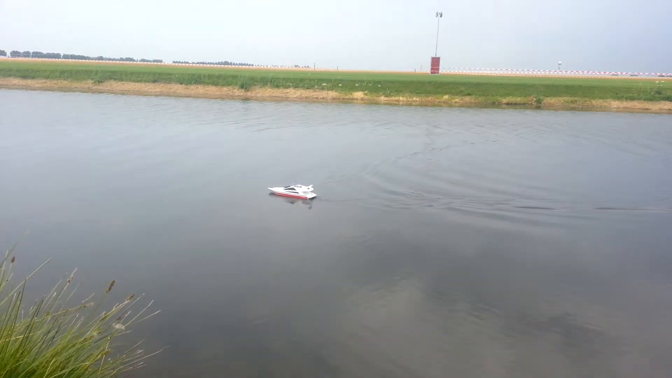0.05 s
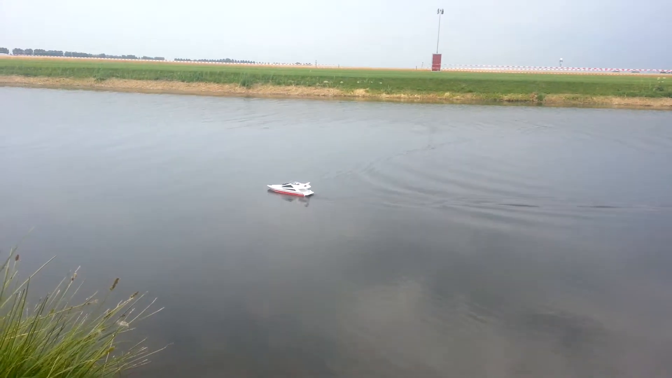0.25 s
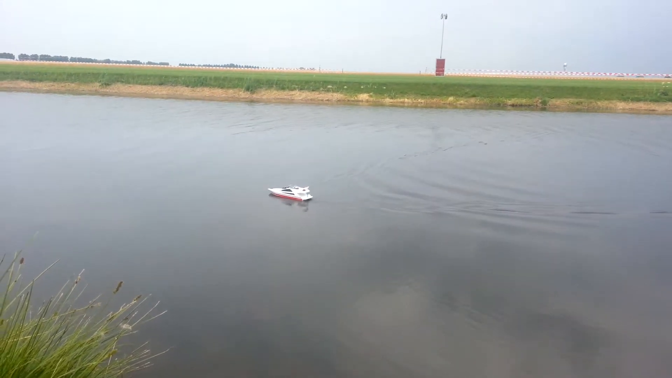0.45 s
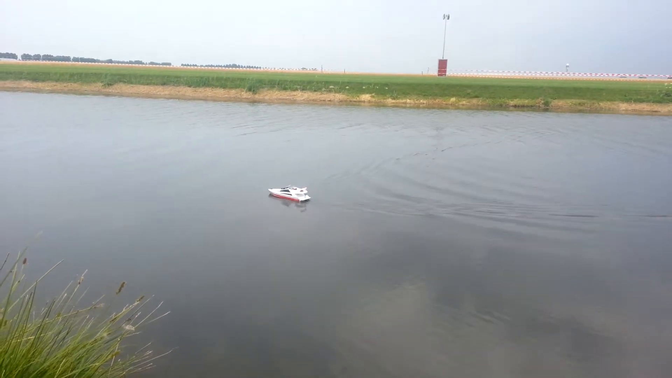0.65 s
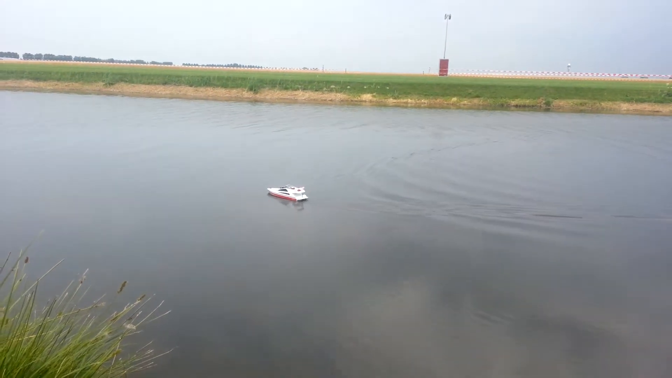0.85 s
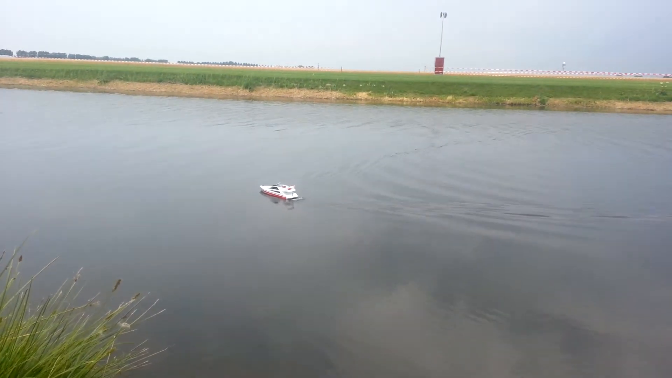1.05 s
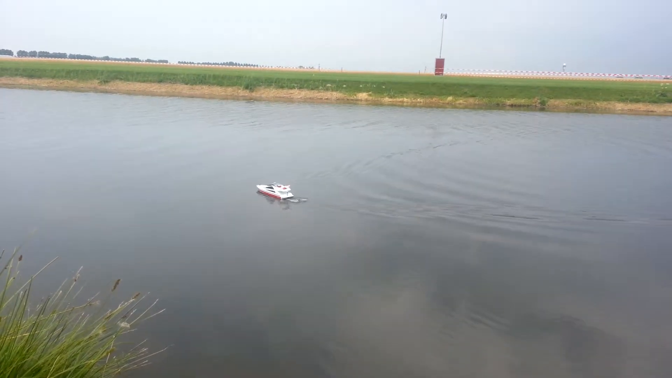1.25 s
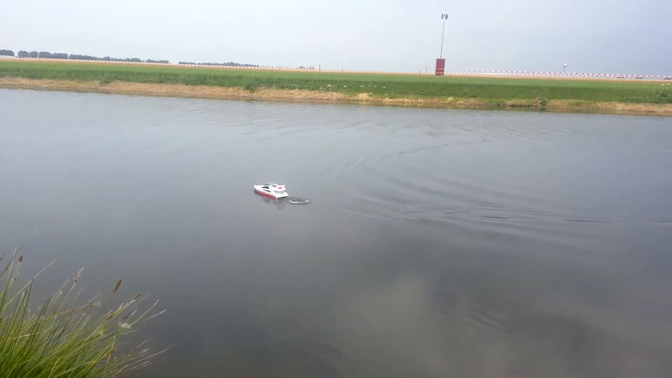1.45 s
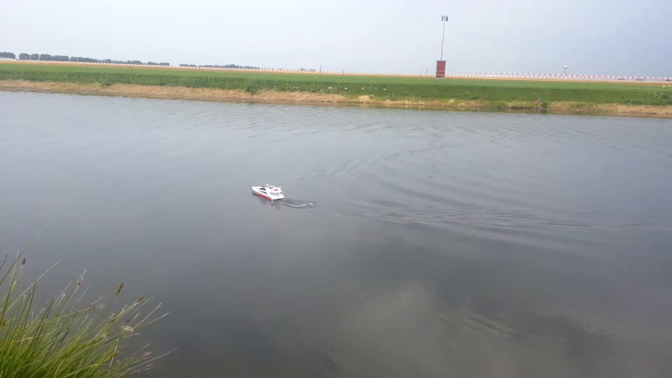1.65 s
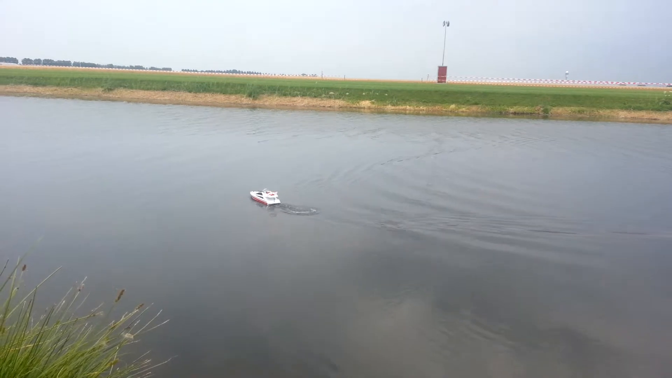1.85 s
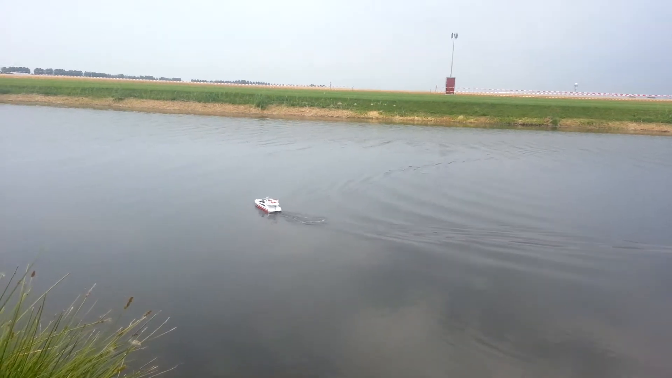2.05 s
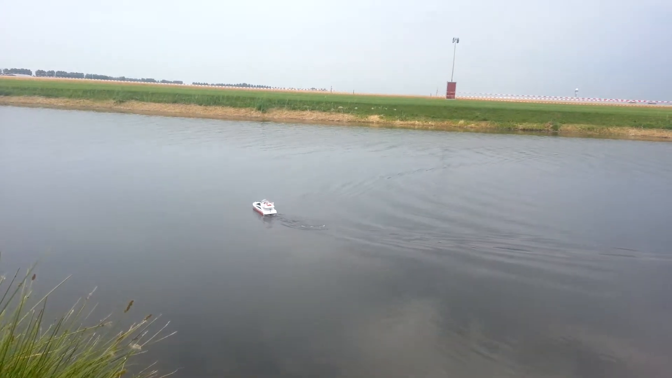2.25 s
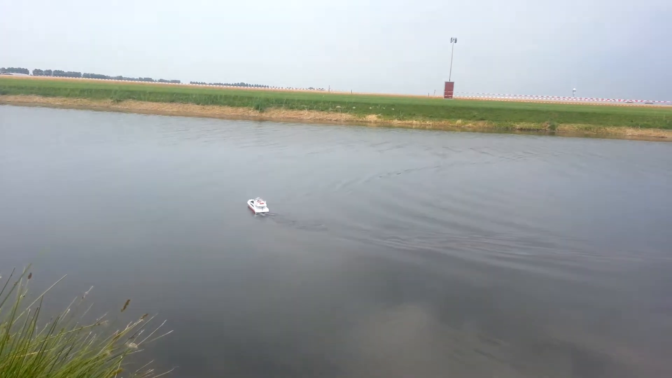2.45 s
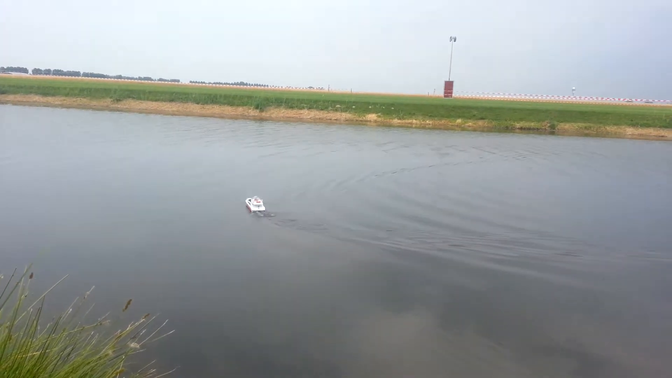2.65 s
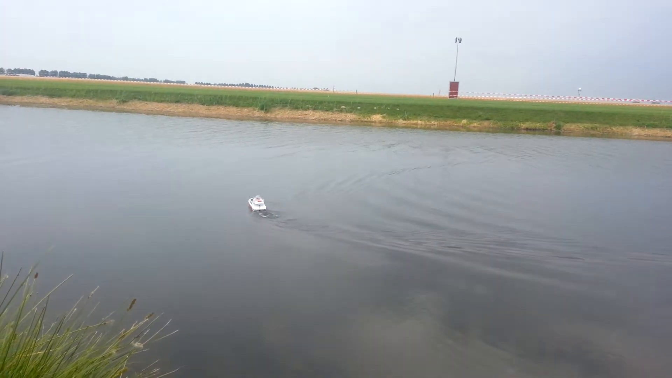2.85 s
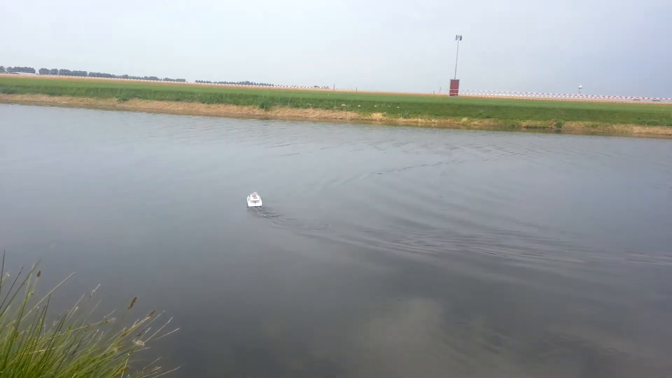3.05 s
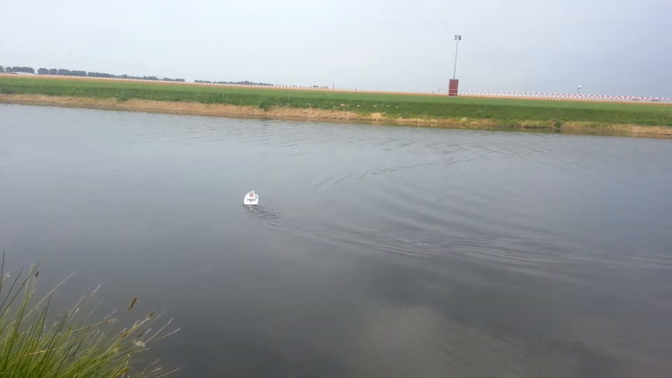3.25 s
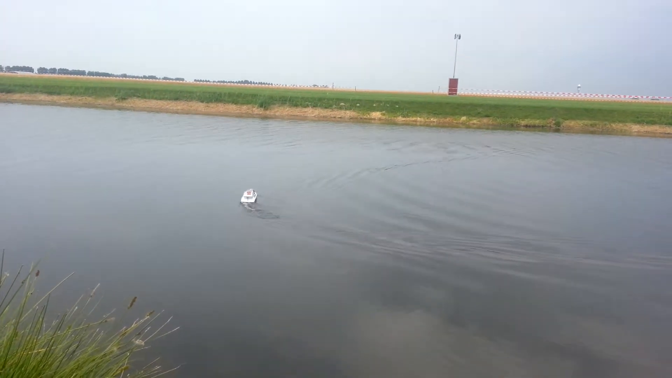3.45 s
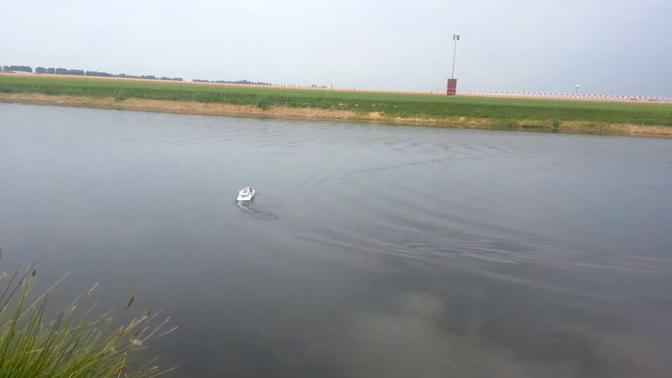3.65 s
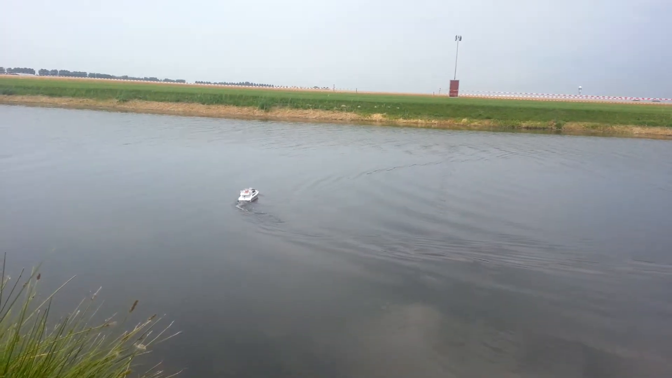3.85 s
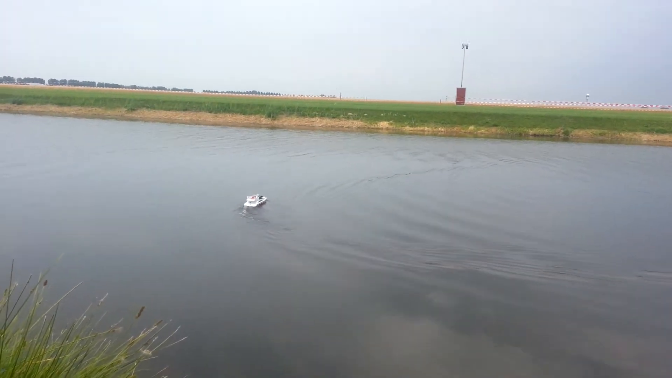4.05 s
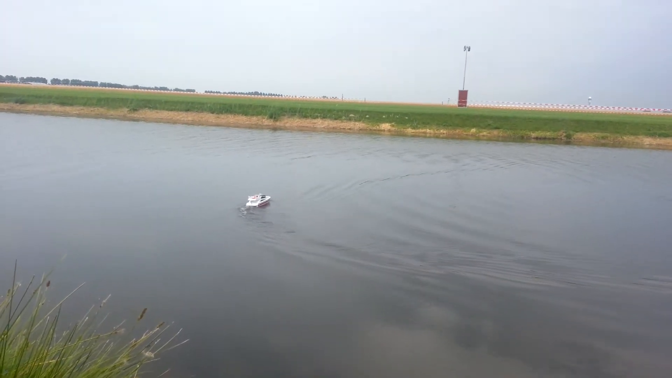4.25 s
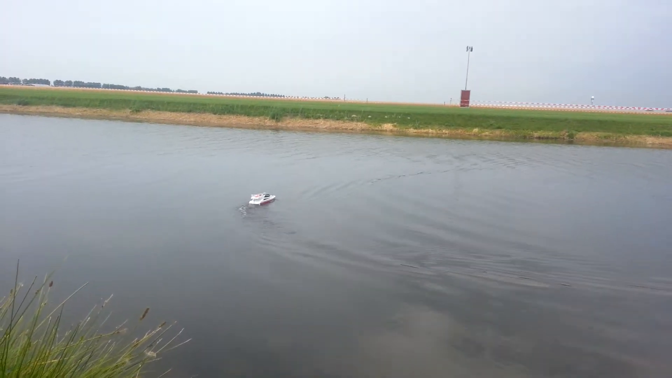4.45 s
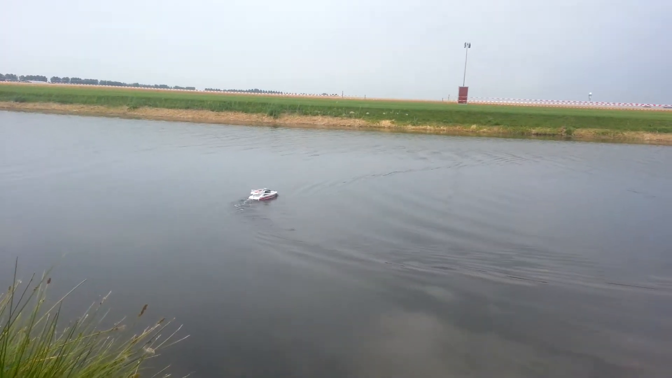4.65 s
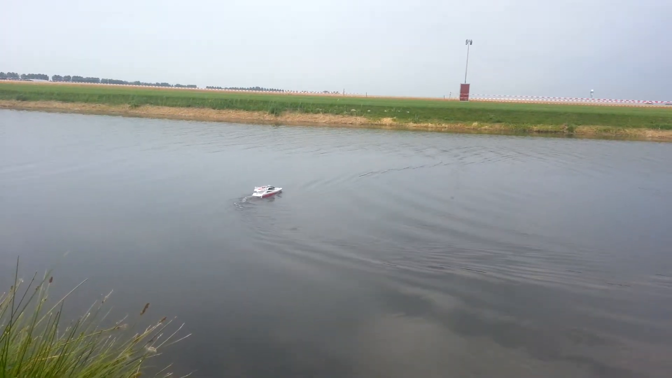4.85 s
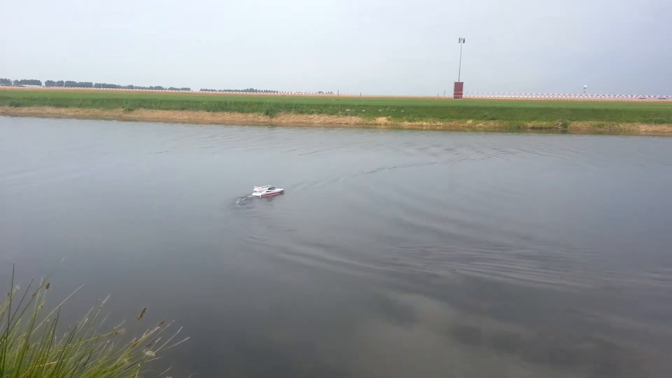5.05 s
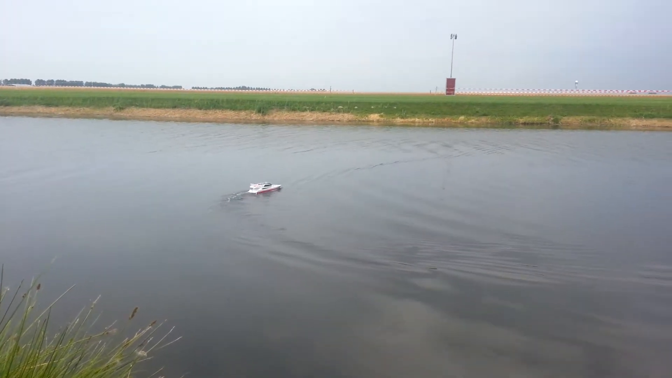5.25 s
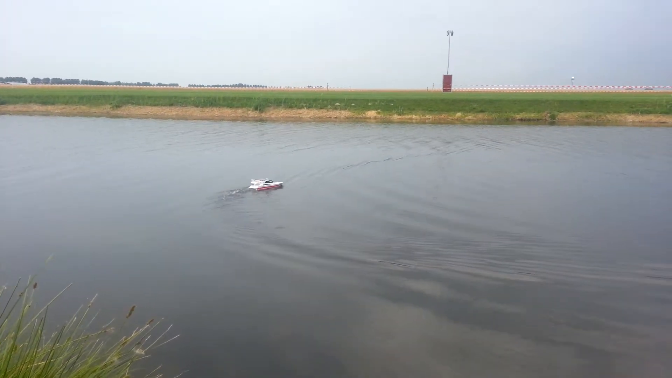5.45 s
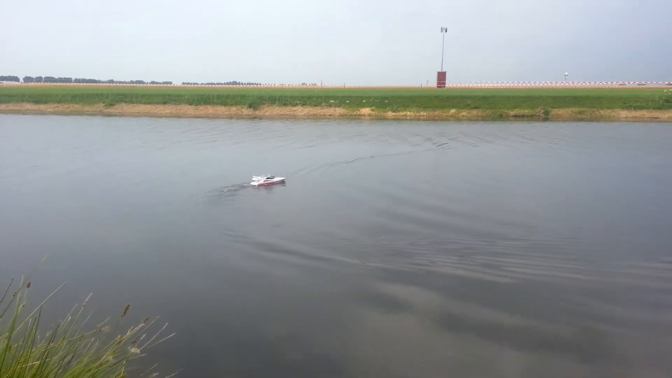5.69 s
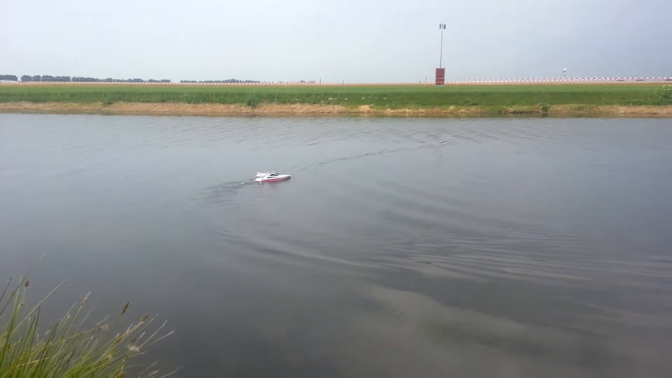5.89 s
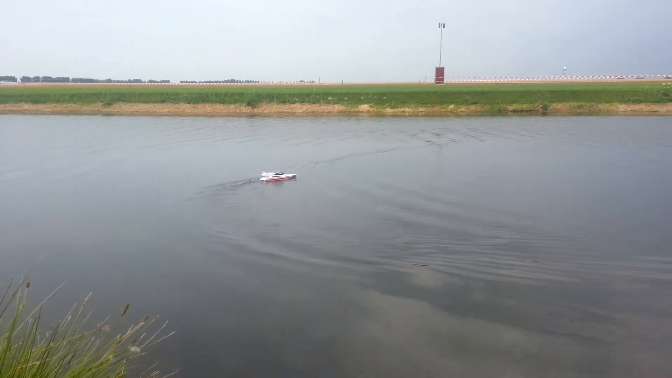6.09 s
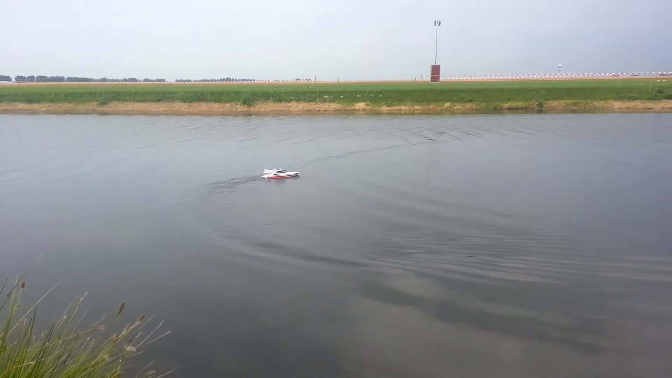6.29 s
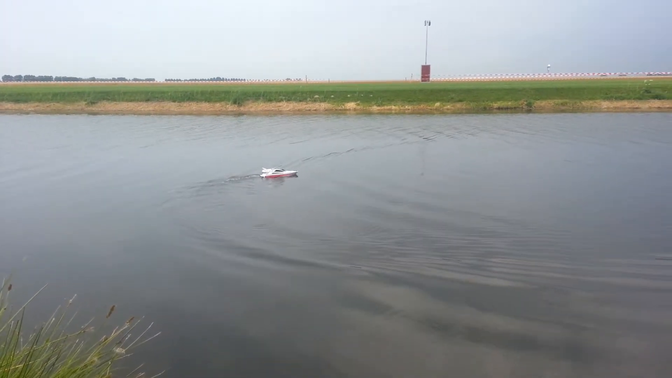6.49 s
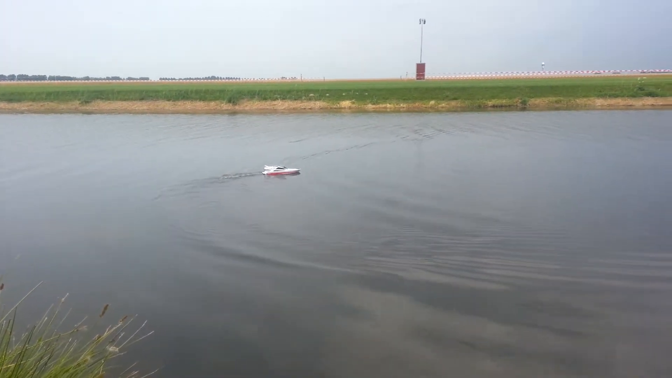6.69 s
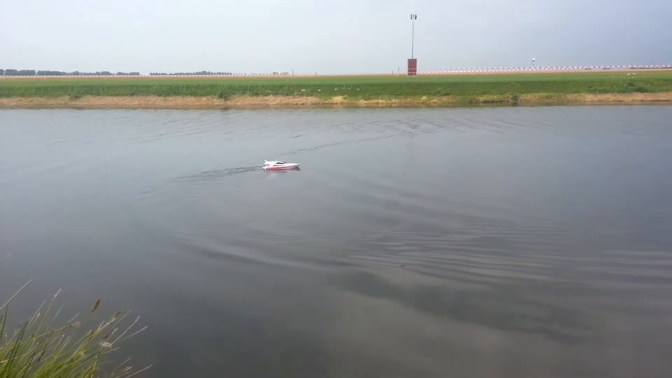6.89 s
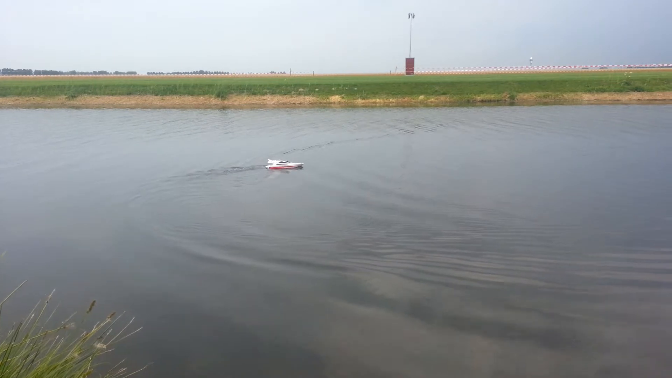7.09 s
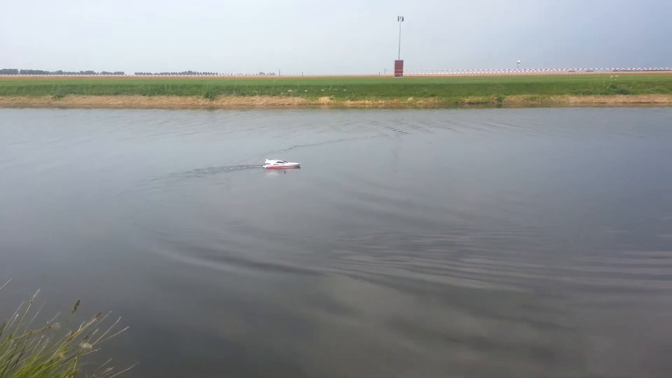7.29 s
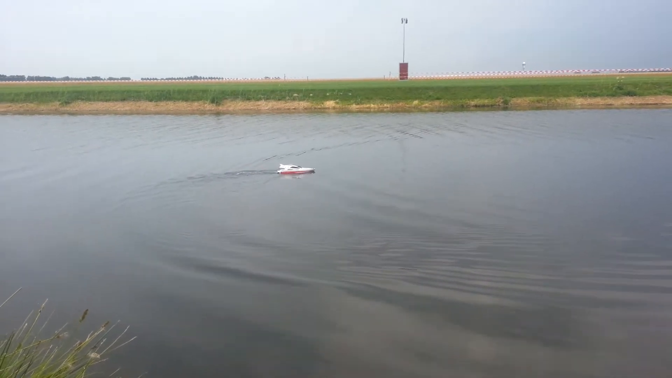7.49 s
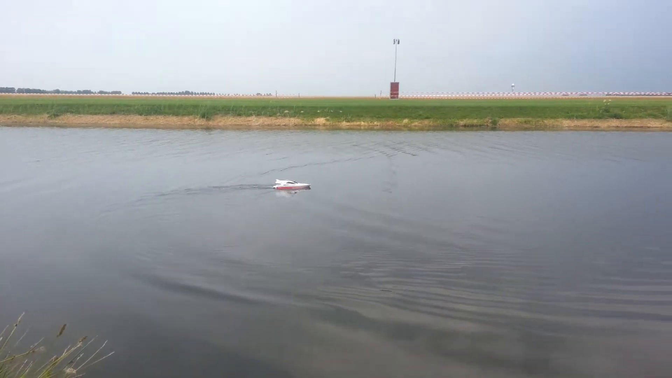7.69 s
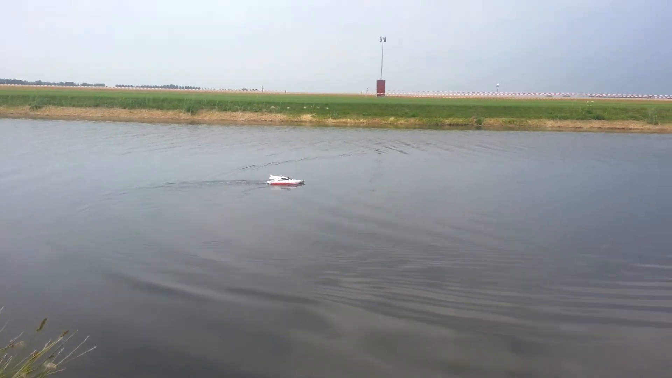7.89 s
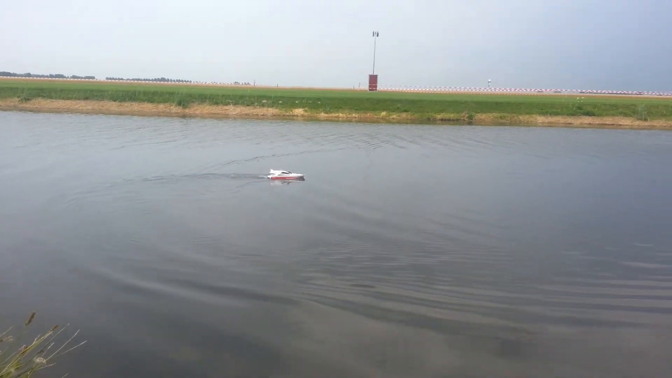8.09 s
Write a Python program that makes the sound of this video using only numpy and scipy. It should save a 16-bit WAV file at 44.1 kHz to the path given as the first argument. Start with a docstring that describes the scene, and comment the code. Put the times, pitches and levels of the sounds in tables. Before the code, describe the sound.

A small model boat's electric motor bursts on, coasts, then runs steadily, its loose shaft rattling buzzily in a hollow hull over quiet outdoor air.

```python
"""The loose drive shaft of a radio-controlled model boat scrapes, taps and knocks in its hollow, ringing hull.
Throttle moves set a lagging shaft speed, slowed by waves: a short burst, a coast, a long run, a turn and away.
The motor hums at shaft orders and adds steady tones; the propeller makes shaped noise, bubble pops and drops.
Shaped noise gurgles as water along the hull; a wavering far engine drones under open-air noise."""
import sys
import numpy as np
from scipy import signal
from scipy.fft import rfft, irfft, next_fast_len
from scipy.io import wavfile
from scipy.ndimage import uniform_filter1d, map_coordinates

SR = 44100
rng = np.random.default_rng(int(sys.argv[2]) if len(sys.argv) > 2 else 0)


def output_pcm(signal):
    """Save a mono or channel-first signal as 16-bit PCM at the path in sys.argv[1].

    Samples are clipped to [-1, 1] before scaling.
    """
    pcm = np.clip(np.atleast_2d(signal).T, -1, 1) * 32767
    wavfile.write(sys.argv[1], SR, np.round(pcm).astype(np.int16))


N = 358533

# open-air noise spectrum: (frequency [Hz], relative level [dB])
AIR_SPECTRUM = [(15, -58), (25, -58), (194, -18), (240, -16), (275, -11.5), (305, -7), (340, -10),
                (388, -17.5), (432, -9), (520, -11), (716, -14.5), (1770, -16), (6520, -29.5),
                (8740, -27.5), (14500, -26.5)]
# open-air level: (time [s], level [dB])
AIR_LEVEL = [(0, -55.5), (0.25, -53), (0.5, -54), (0.75, -57), (1.0, -53), (2.1, -54), (3, -50.5)]
# left-right correlation of the air: (frequency [Hz], correlation [-1 to 1])
AIR_CORRELATION = [(60, -0.098), (150, 0.43), (380, 0.85), (940, -0.21), (2350, -0.26), (5880, 0.14),
                   (14700, -0.18)]
# far engine note: (time [s], frequency [Hz], level [dB])
DRONE = [(0.4, 312.4, -62), (0.7, 300.4, -77), (2.0, 298, -68.5), (2.9, 290, -62), (3.6, 303, -73),
         (5.3, 286.4, -58), (6.8, 306, -78)]

# boat, level between channels: (frequency [Hz], left minus right [dB])
BOAT_BALANCE = [(700, -0.5), (950, -5), (1100, -0.5), (1650, -9.5), (1920, -4.5), (2200, -11), (2550, -2),
                (2800, -9), (3100, 3.5), (3450, -4.5), (4700, 6), (6000, -8), (9000, 3), (14000, 8)]
# boat, phase between channels: (frequency [Hz], left lead [rad])
BOAT_PHASE = [(250, -0.5), (850, 0.9), (1400, -1.4), (1850, 1), (2080, -1.5), (2400, 0.5), (2700, 0.37),
              (3050, 0.5), (3400, 1.5), (4300, 0), (5200, 3.5), (6200, 4.5), (8500, 5), (10500, -6)]
# sound scattered by the water: (frequency [Hz], level against direct sound [dB])
BOAT_SCATTER = [(300, -13), (700, -14.5), (1500, -9.5), (2500, -8.5), (3600, -8), (6000, -6), (8000, -2),
                (10000, 28)]
TOP_HZ = 14600

# throttle stick moves: (time [s], shaft speed asked for [turns/s], 0 = motor off)
THROTTLE = [(0.985, 37), (1.052, 46.4), (1.315, 38), (1.66, 38.6), (1.892, 0), (2.255, 37), (2.325, 44),
            (2.55, 42), (2.91, 45.3), (3.2, 46.1), (3.42, 47), (4.6, 46.8), (5.25, 45.9), (6.46, 44.7),
            (7.17, 45.5), (7.65, 46.7)]
# small waves load the propeller, a trough frees it: (time [s], speed lost [turns/s])
WAVES = [(3.84, 2.7), (4.0, 1.7), (4.46, 3), (4.97, 3.3), (5.14, -1.3), (5.33, 1.3), (5.88, 0.9),
         (6.19, 2.5)]
SPIN_UP_S, SPIN_DOWN_S = 0.036, 0.062  # lag time constants
WAVE_HALF_S = 0.1  # half the time a wave takes to pass
WAVER_TURNS_PER_S, WAVER_PER_S = 0.25, 10  # ripples make the speed waver
CRUISE_TURNS_PER_S = 46
# boat at cruising speed as it nears, turns, leaves: (time [s], hull rattle [dB], propeller fizz [dB])
PASSAGE = [(1.08, -32.3, -59), (1.3, -36.5, -54), (1.45, -40.5, -58), (1.85, -39, -49), (2.42, -37, -47.5),
           (2.62, -35.5, -48), (2.8, -40.5, -55.5), (2.9, -40.5, -68), (2.98, -38, -51.5),
           (3.3, -38, -48.5), (3.75, -39, -56.5), (4.1, -38.5, -55), (4.9, -38, -57), (5.3, -39, -55.5),
           (5.8, -39, -57), (6.5, -40.5, -55), (7.2, -41.5, -54), (8.1, -43.5, -57.5)]
# times of the bow, stern, quarter, side and far-side views: (time [s])
HEADINGS_S = [1.5, 3.5, 5.2, 6.7, 8.0]
RATTLE_DB_PER_OCTAVE, FIZZ_DB_PER_OCTAVE, HUM_DB_PER_OCTAVE = 13, 18, 11.5  # per doubling of shaft speed

# water noise along the hull: (frequency [Hz], relative level [dB])
WATER_SPECTRUM = [(60, -59), (110, -67), (150, -25), (210, -16.5), (285, -1), (360, -9), (430, 3.5),
                  (600, -3.5), (1200, -43)]
# water surges against the hull: (time [s], half length [s], level [dB])
SURGES = [(1.22, 0.11, -55), (4.2, 0.19, -51.5), (5.3, 0.34, -51.5), (8.0, 0.28, -50.5)]
WASH_DB = -62

# loudest drops thrown by the propeller: (time [s], peak level [dB], starting pitch [Hz])
DROPS = [(1.074, -37, 5970), (1.218, -37, 7340), (1.236, -34, 7600), (1.33, -37, 5870), (1.811, -34, 4720),
         (2.487, -29.5, 4020), (3.58, -34.5, 4620), (4.069, -37, 4700), (4.157, -35, 4430),
         (5.633, -28.5, 3340), (6.951, -32, 4170), (7.036, -38, 4223), (7.905, -35, 4020)]
# propeller froth: (frequency [Hz], relative level [dB])
FIZZ_SPECTRUM = [(1500, -54), (3000, 9.5), (4300, 6.5), (5300, 8), (6300, -3), (7600, -7), (9000, -6.5),
                 (11000, -1), (14500, -23)]
# finest spray: (frequency [Hz], relative level [dB])
MIST_SPECTRUM = [(3500, -42), (5200, -16), (6300, 3), (8200, -2), (9200, -10), (14500, -18)]
# propeller breaks the surface: (time [s], half length [s], fizz level [dB], mist level [dB])
SPRAYS = [(1.017, 0.006, -46, -56), (1.093, 0.032, -58, -49), (1.204, 0.069, -47, -52),
          (1.655, 0.05, -62, -53), (1.84, 0.028, -56, -52), (2.41, 0.055, -50, -76),
          (3.32, 0.043, -64.5, -61), (4.558, 0.04, -51, -71), (5.14, 0.19, -57, -59),
          (5.648, 0.0088, -49, -58), (5.99, 0.023, -50.5, -56), (6.63, 0.054, -61, -61),
          (6.99, 0.085, -57, -60), (7.15, 0.0055, -55, -46), (7.54, 0.099, -55, -58)]
FIZZ_WANDER_DB, FIZZ_WANDER_PER_S = 2, 9.9  # the propeller draws air unevenly

# motor hum at cruising speed: (time [s], lower line [dB], upper line [dB])
HUM = [(1.0, -57, -61), (1.2, -47, -62), (1.33, -52, -50), (1.5, -51, -61), (1.85, -54, -60),
       (2.4, -54, -54), (2.9, -54, -52), (3.2, -50, -47.5), (3.55, -51, -45.5), (3.85, -54, -50),
       (4.0, -53, -46), (4.25, -52, -50), (4.48, -51, -44), (4.72, -49, -49), (4.95, -52, -49),
       (5.16, -52, -44.5), (5.4, -53, -50), (5.7, -51, -47.5), (6.15, -53, -54), (6.42, -47.5, -53),
       (6.62, -51, -53), (6.8, -52, -52), (6.97, -46.5, -62), (7.35, -48, -60), (7.6, -52, -60),
       (8.1, -49.5, -62)]
# hum order between them swells, at cruising speed: (time [s], half length [s], level [dB])
MIDDLE_HUM = [(1.22, 0.07, -50), (6.33, 0.053, -51)]
# hum lines, lower to upper: (multiple of shaft speed)
HUM_ORDERS = (13, 14, 15)
HUM_ROUGHNESS, HUM_FLUTTERS_PER_S = 0.37, 70
# steady drive tones at cruising speed: (frequency [Hz], level before heading offset [dB])
WHINE = [(1809, -57.5), (1901, -58.5), (5704, -71), (6375, -75), (7279, -79)]
# offset of the steady tones, one for each heading: (level [dB])
WHINE_HEADING_DB = (3, -1, -3, -0.5, -6)

# broad hull radiation: (frequency [Hz], gain [dB])
HULL_RADIATION = [(50, -62), (100, -66.5), (250, -24.5), (380, -23), (520, -9.5), (800, -3.5),
                  (1050, -10.5), (2050, -15.5), (2800, -18), (4500, -27.5), (5400, -22.5), (8500, -30.5),
                  (15000, -46)]
# hull resonances: (frequency [Hz], width [Hz], gain from bow, stern, quarter, side, far side [dB])
HULL_MODES = [(601, 108, 7.5, 3, 0.5, 3, 0), (695, 190, 3, 0.5, 4, 2, -3),
              (892, 190, 0, 2.5, -1.5, -5.5, -4), (1142, 32, 4, -6.5, 0, 8, 3.5),
              (1270, 240, 12, 10.5, 2.5, 3, 11.5), (1457, 370, 5, 9.5, 11, 6.5, -5),
              (1733, 260, 6.5, 9.5, 9, -2, 7), (2000, 330, 4.5, -13, 1.5, -0.5, 3),
              (2319, 400, 9.5, 12, 14.5, 9, 2.5), (2494, 95, 4, 1.5, 1.5, 9, 0),
              (2930, 140, 8.5, 4, -1, 9, 1), (3395, 410, 4.5, 9.5, 2.5, 6.5, 0),
              (3996, 340, 7.5, 3.5, 9.5, 11, 9), (4900, 540, 7.5, 7.5, 4, 1, 3),
              (5000, 260, -3, 8, -2, -2, -2), (5720, 200, 7, 2, 2, 0, 0), (6080, 560, 3, -20, 0.5, -16, -5),
              (7600, 2900, 6, 1.5, -0.5, 0.5, -3.5)]
ROCK_DETUNE, ROCKS_PER_S = 0.025, 5  # resonance shift as a share; shifts per second
# shaft tube rings: (frequency [Hz], relative level [dB], t60 [s])
TUBE = [(1254, -0.5, 0.014), (1565, -0.5, 0.022), (1783, -6, 0.034), (2367, -4.5, 0.026),
        (3420, -13, 0.0097)]
# hardest knocks: (time [s], peak [dB], favoured pitch [Hz], crack over ring [dB], thud over ring [dB])
KNOCKS = [(0.9713, -34, 1910, -1.5, -12), (0.9858, -32, 2400, 18, -8), (1.0055, -32, 1500, -7, -10),
          (1.013, -28, 2020, -6, -18), (1.066, -23, 1750, -18, -16), (1.311, -21.5, 1570, -22, -8),
          (1.5227, -33, 1500, -16, -10), (1.599, -25, 1390, -13, -8), (1.815, -34, 1500, -10, -8),
          (2.263, -40, 1500, -9, 5), (2.2994, -27.5, 1610, 2, 3.5), (2.401, -23.5, 1500, -11, -10),
          (2.428, -26, 1500, -19, -13), (2.936, -28, 1400, -24, -8), (2.958, -24, 1400, -22, -8),
          (3.179, -24.5, 1340, -16, -11), (3.272, -20.5, 1690, -20, -10), (3.4565, -27, 1500, -8, -10),
          (3.732, -23, 1570, -23, -14), (3.843, -24.5, 1580, -24, -16), (3.915, -22, 1590, -28, -18),
          (3.9607, -26, 1450, -20, -12), (4.045, -24.5, 1500, -20, -12), (4.067, -27, 1300, -22, -12),
          (4.078, -28, 2450, -20, -18), (4.1275, -25.5, 1300, -16, -12), (4.472, -21.5, 1540, -9, -4),
          (5.633, -23.5, 2350, -12, -12), (5.701, -29, 1800, -9, -3), (5.7236, -26.5, 2230, -17, -9),
          (5.766, -25.5, 1700, -11, -7)]
OFF_SPOT_DB_PER_OCTAVE, CRACK_T60_S = 28, 0.013  # loss away from favoured pitch; crack decay

BEARING_PLAY_TURNS = 0.018  # shifts each contact
REBOUND_TURNS = 0.4  # second contact after the first
TAP_DB, TAP_SCATTER_DB, SECOND_TAP_DB = -11, 4, 0  # taps against rattle; scatter; second against first tap
TAP_CLUSTER_DB, TAP_CLUSTERS_PER_S = 2, 13
TAP_DETUNE = 0.047  # share of pitch, varies with the spot hit
TAP_TICK_DB, TAP_TICK_T60_S = -14, 0.029
WEAR_SHIFTS_PER_S = 3  # creep onto other worn spots
GRIT_PER_S, GRIT_DB = 700, -5  # grains; level against the scraping
RATTLE_WANDER_DB, RATTLE_WANDER_PER_S = 0.19, 11  # shaft pressure comes and goes
# shaft bears harder on its tube: (time [s], half length [s], extra rattle [dB])
PRESSES = [(1.011, 0.011, 14), (1.6, 0.049, 3), (2.385, 0.028, 1.5), (3.99, 0.11, 1.5), (5.12, 0.095, 2.5),
           (6.47, 0.17, 3), (7.02, 0.08, 1.6)]


def amp(db):
    """Decibels to gain."""
    return 10 ** (np.asarray(db) / 20)


def unit(x):
    """Scale to rms 1."""
    return x / np.sqrt(np.mean(x ** 2) + 1e-20)


def along(points, hz):
    """(Hz, value) points read on a log axis."""
    f, v = np.transpose(points)
    return np.interp(np.log(hz + 1), np.log(f + 1), v)


def curves(rows):
    """One value per sample for each column after the time."""
    s, *cols = np.transpose(rows)
    return [np.interp(np.arange(N) / SR, s, c) for c in cols]


def wobble(rate):
    """Smooth random curve, rate knots a second."""
    knots = rng.standard_normal(int(N * rate / SR) + 4)
    return map_coordinates(knots, [np.arange(N) * rate / SR], order=2)


def bumps(rows, value):
    """Sum of bell shapes (s, half length s, dB), each scaled by value(dB)."""
    t = np.arange(N) / SR
    return sum(value(db) * np.exp(-((t - s) / half) ** 2) for s, half, db in rows)


def swells(rows):
    """Gain of bell-shaped swells (s, half length s, dB)."""
    return bumps(rows, amp)


def filtered(x, response):
    """x times a complex response of frequency."""
    size = 2 * next_fast_len(N // 2 + SR // 8)
    return irfft(rfft(x, size) * response(np.fft.rfftfreq(size, 1 / SR)), size)[..., :N]


def butter(x, order, hz, kind):
    """x through a Butterworth filter."""
    return signal.lfilter(*signal.butter(order, hz, kind, fs=SR), x)


def causal(db):
    """Minimum-phase response with this gain: it rings only after a blow."""
    cepstrum = irfft(np.log(amp(db)))
    half = len(cepstrum) // 2
    cepstrum[1:half] *= 2
    cepstrum[half + 1:] = 0
    return np.exp(rfft(cepstrum))


def coloured(x, spectrum):
    """x through a spectrum, at rms 1."""
    return unit(filtered(x, lambda hz: amp(along(spectrum, hz))))


def steady(x, seconds):
    """x with its slow swells taken out, at rms 1."""
    return x / np.sqrt(np.abs(uniform_filter1d(x ** 2, int(seconds * SR))) + 1e-12)


def background():
    """Partly correlated open-air noise and a far engine whose note wavers."""
    a, b = rng.standard_normal((2, N))
    angle = lambda hz: np.arccos(np.clip(along(AIR_CORRELATION, hz), -1, 1)) / 2
    mid = filtered(a, lambda hz: np.cos(angle(hz)))
    side = filtered(b, lambda hz: np.sin(angle(hz)))
    air_gain = amp(curves(AIR_LEVEL)[0] + 0.77 * wobble(9.8))
    air = air_gain * coloured(np.array([mid + side, mid - side]), AIR_SPECTRUM)
    hz, db = curves(DRONE)
    tone = unit(np.sin(2 * np.pi * np.cumsum(hz) / SR + .5 * wobble(22)))
    return air + amp(db + 2.3 * wobble(12)) * tone


def ripples(x, t60):
    """Echoes off moving water: short noise tails, new from moment to moment."""
    hop, t = SR // 20, np.arange(SR // 10) / SR
    out = np.zeros((2, N + SR))
    for start in range(0, N, hop):
        piece = x[start:start + 2 * hop]
        piece = piece * np.sin(np.pi * np.arange(len(piece)) / (2 * hop))
        tails = rng.standard_normal((2, len(t))) * amp(-60 * t / t60)
        tails /= np.linalg.norm(tails, axis=1, keepdims=True)
        echo = signal.fftconvolve(piece[None], tails, axes=1)
        out[:, start:start + echo.shape[1]] += echo
    return out[:, :N]


def across_water(x, t60):
    """The boat reaches both channels directly and scattered by the water."""
    ear = np.array([[.5], [-.5]])
    wet = lambda hz: amp(along(BOAT_SCATTER, hz))
    direct = filtered(x, lambda hz: np.exp(1j * ear * along(BOAT_PHASE, hz)))
    pair = direct + filtered(ripples(x, t60), wet)
    return filtered(pair, lambda hz: amp(ear * along(BOAT_BALANCE, hz)) / np.hypot(1, wet(hz)))


def shaft_speed():
    """Turns/s: first-order lag after each throttle move, a brief dip in each wave."""
    t = np.arange(N) / SR
    times, asked = np.transpose(THROTTLE)
    speed = np.zeros(N)
    for s, step in zip(times, np.diff(asked, prepend=0)):
        lag = SPIN_UP_S if step > 0 else SPIN_DOWN_S
        speed += step * (1 - np.exp(-np.maximum(t - s, 0) / lag))
    braking = sum(lost * np.exp(-((t - s) / WAVE_HALF_S) ** 2) for s, lost in WAVES)
    return speed - braking + WAVER_TURNS_PER_S * wobble(WAVER_PER_S)


def powered():
    """1 while the motor gets current, 0 while the stick is at rest, edges smoothed."""
    times, asked = np.transpose(THROTTLE)
    on = np.append(0.0, asked > 0)[np.searchsorted(times, np.arange(N) / SR)]
    return uniform_filter1d(on, SR // 40)


def facing_bank(values):
    """One value per heading, blended as the boat turns."""
    return np.interp(np.arange(N) / SR, HEADINGS_S, values)


def contact(turns, second, width):
    """Two pressure pulses in each shaft turn, the other one scaled by second."""
    press = lambda at: np.exp((np.cos(2 * np.pi * (turns - at - .05)) - 1) / width)
    return press(0) + second * press(REBOUND_TURNS)


def wash():
    """Water gurgles low along the hull from the first push on, and surges now and then."""
    under_way = np.clip((np.arange(N) / SR - THROTTLE[0][0]) / 0.2, 0, 1)
    gain = np.hypot(amp(WASH_DB) * under_way, swells(SURGES))
    return gain * amp(2.0 * wobble(20)) * coloured(rng.standard_normal(N), WATER_SPECTRUM)


def drops():
    """Each drop traps a tiny bubble that rings, rising in pitch."""
    t, out = np.arange(SR // 30) / SR, np.zeros(N)
    for s, db, hz in DROPS:
        ring = np.sin(2 * np.pi * hz * t * (1 + 3 * t)) * (1 - np.exp(-t / 0.00027))
        out[round(s * SR):][:len(t)] += amp(db - 60 * t / 0.016) * ring
    return out


def propeller(turns, fizz_db, crackle):
    """Blades whip air into the water in step with the shaft; tiny bubbles pop, spray hisses."""
    bursts = (.45 + contact(turns, second=0.5, width=0.35)) * amp(0.6 * wobble(260))
    t = np.arange(SR // 150) / SR
    when, pitch = rng.random((2, 2500, 1))
    start = (when * (N - len(t))).astype(int)
    hz = 3200 * 2.6 ** pitch
    size = bursts[start] * amp(5.8 * np.minimum(rng.exponential(size=when.shape), 2.6))
    pops = size * np.sin(2 * np.pi * hz * t) * hz * t * np.exp(-hz * t / 1.33)
    bubbles = np.bincount((start + np.arange(len(t))).ravel(), pops.ravel(), N)
    froth = lambda: unit(bursts * rng.standard_normal(N)) + crackle * unit(bubbles)
    coarse = swells([(s, half, db) for s, half, db, _ in SPRAYS])
    fine = swells([(s, half, db) for s, half, _, db in SPRAYS])
    gain = np.hypot(amp(fizz_db + FIZZ_WANDER_DB * wobble(FIZZ_WANDER_PER_S)), coarse)
    return gain * coloured(froth(), FIZZ_SPECTRUM) + fine * coloured(froth(), MIST_SPECTRUM)


def motor(turns, octaves):
    """Neighbouring shaft orders hum roughly; the drive adds thin steady tones; both grow with speed."""
    lower_db, upper_db = curves(HUM)
    gains = amp(lower_db), swells(MIDDLE_HUM), amp(upper_db)
    rough = lambda: HUM_ROUGHNESS * wobble(HUM_FLUTTERS_PER_S)
    hum = np.zeros(N)
    for order, gain in zip(HUM_ORDERS, gains):
        hum += gain * (1 + rough()) * np.sin(2 * np.pi * order * turns + rough())
    hum = butter(hum, 2, 350, "highpass")
    t, whine = np.arange(N) / SR, np.zeros(N)
    for hz, db in WHINE:
        whine += amp(db + 1.9 * wobble(8)) * np.sin(2 * np.pi * hz * t + 0.7 * wobble(35))
    drive = np.sqrt(2) * powered() * amp(HUM_DB_PER_OCTAVE * octaves)
    return drive * (hum + amp(facing_bank(WHINE_HEADING_DB)) * whine)


def knocks():
    """Hard shaft blows: the spot picks the tube ring, with a crack above and a hull thud below."""
    t, out = np.arange(SR // 30) / SR, np.zeros(N)
    peak = lambda v: v / np.abs(v).max()
    for s, db, spot_hz, crack_db, thud_db in KNOCKS:
        ring = np.zeros(len(t))
        for hz, level_db, t60 in TUBE:
            off_spot_db = OFF_SPOT_DB_PER_OCTAVE * abs(np.log2(hz / spot_hz))
            gain = amp(level_db + rng.normal(0, 1.4) - off_spot_db - 60 * t / t60)
            ring += gain * np.sin(2 * np.pi * hz * (t - 0.0015))
        ring *= 1 - np.exp(-t / 0.00037)
        crack = butter(rng.standard_normal(len(t)), 2, (2200, 6500), "bandpass")
        crack = crack * amp(-60 * t / CRACK_T60_S)
        thud = sum(np.sin(2 * np.pi * hz * t) * np.exp(-np.pi * width * t)
                   for hz, width, *_ in HULL_MODES[:2])
        blow = peak(ring) + amp(crack_db) * peak(crack) + amp(thud_db) * peak(thud)
        out[round(s * SR):][:len(t)] += amp(db) * peak(blow)
    return butter(out, 2, 400, "highpass")


def taps(turns, rattle_db):
    """The loose shaft taps its tube twice a turn, in bunches of level; the first tap of each turn also ticks."""
    t = np.arange(SR // 50) / SR
    loose = turns + BEARING_PLAY_TURNS * wobble(70)
    first, second = (np.flatnonzero(np.diff(np.floor(loose - at))) for at in (0, REBOUND_TURNS))
    start = np.append(first, second)
    is_first = np.arange(len(start))[:, None] < len(first)
    index = (start[:, None] + np.arange(len(t))).ravel()
    place = lambda blows: unit(np.bincount(index, blows.ravel(), N)[:N])

    hz, db, t60 = np.transpose(TUBE)[:, :, None]
    draws = rng.standard_normal((len(start), 3, len(TUBE), 1))
    detune, colour, strength = draws.swapaxes(0, 1)
    decay = amp(db + 2.6 * np.tanh(colour) - 60 * t / t60)
    rings = (decay * np.sin(2 * np.pi * (hz * (1 + TAP_DETUNE * detune) * t + colour))).sum(axis=1)
    bunches_db = TAP_CLUSTER_DB * np.tanh(wobble(TAP_CLUSTERS_PER_S))[start, None]
    size = amp(TAP_SCATTER_DB * np.tanh(strength[:, 0]) + bunches_db)
    size = size * np.where(is_first, 1, amp(SECOND_TAP_DB))
    attack = 1 - np.exp(-t / 0.001)

    ticks = place(is_first * attack * amp(-60 * t / TAP_TICK_T60_S)) * rng.standard_normal(N)
    ticks = unit(butter(ticks, 3, (2100, 3600), "bandpass"))
    return amp(rattle_db + TAP_DB) * (place(size * rings * attack) + amp(TAP_TICK_DB) * ticks)


def hull(force):
    """Hull resonances: their mix follows the heading, their pitch drifts as the boat rocks."""
    fc, width, *gains = np.transpose(HULL_MODES)
    hz = np.linspace(0, SR / 2, 4097)
    bells = 1 / (1 + (2 * (hz[:, None] - fc) / width) ** 2)
    now = np.arange(N)
    # ring on a warped clock, then unwarp: only the resonances shift
    clock = np.cumsum(1 + ROCK_DETUNE * np.tanh(wobble(ROCKS_PER_S)))
    push = map_coordinates(force, [np.interp(np.arange(N + SR // 4), clock, now)])
    out = np.zeros(N)
    for facing, gain_db in zip(np.eye(len(HEADINGS_S)), gains):
        ring = irfft(causal(along(HULL_RADIATION, hz) + bells @ gain_db))
        rung = signal.oaconvolve(push, ring)[:len(push)]
        out += facing_bank(facing) * np.interp(clock, np.arange(len(push)), rung)
    return out


def rattle(turns, rattle_db, scatter_db, rub, repeat, rough_db):
    """Shaft scrapes under two pressure pulses a turn; worn spots recur each turn, grit crackles."""
    loose = turns + BEARING_PLAY_TURNS * wobble(70)
    half_turn = (2 * loose + .3).astype(int)
    size = amp(scatter_db * np.tanh(rng.standard_normal(half_turn.max() + 1)))[half_turn]
    pressure = rub + size * contact(loose, second=.45, width=.08)
    spot = (1024 * (turns % 1)).astype(int)
    surfaces = rng.standard_normal((3, 1024))
    worn = unit(sum(surface[spot] * wobble(WEAR_SHIFTS_PER_S) for surface in surfaces))
    grains = (rng.random(N) < GRIT_PER_S / SR) * rng.choice((-1, 1), N)
    grit = unit(grains * amp(4 * np.tanh(rng.standard_normal(N))))
    rubbing = amp(rough_db * wobble(700)) * (repeat * worn + rng.standard_normal(N))
    scrape = pressure * (rubbing + amp(GRIT_DB) * grit)
    return amp(rattle_db) * steady(hull(scrape), 0.14)


def pressing():
    """Extra rattle in dB while the shaft bears harder on its tube."""
    return bumps(PRESSES, lambda db: db)


def scene():
    """Throttle sets shaft speed; speed sets pitch and strength of the boat's sounds."""
    speed = shaft_speed()
    turns = np.cumsum(speed) / SR
    octaves = np.log2(np.maximum(speed, 1) / CRUISE_TURNS_PER_S)
    rattle_db, fizz_db = curves(PASSAGE)
    rattle_db = rattle_db + pressing() + RATTLE_DB_PER_OCTAVE * octaves
    rattle_db = rattle_db + RATTLE_WANDER_DB * wobble(RATTLE_WANDER_PER_S)
    fizz_db = fizz_db + FIZZ_DB_PER_OCTAVE * octaves

    boat = wash() + drops() + propeller(turns, fizz_db, crackle=0.61) + motor(turns, octaves)
    boat = boat + knocks() + taps(turns, rattle_db)
    boat = boat + rattle(turns, rattle_db, scatter_db=1, rub=.76, repeat=.75, rough_db=.8)
    return background() + across_water(boat, t60=0.042)


def record(dry):
    """Cut everything from TOP_HZ up."""
    return filtered(dry, lambda hz: hz < TOP_HZ)


dry = scene()
out = record(dry)
output_pcm(out)
```